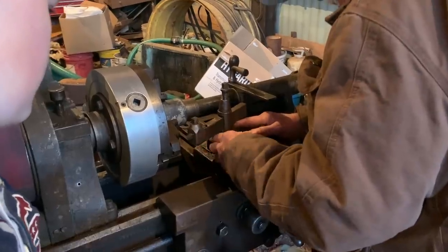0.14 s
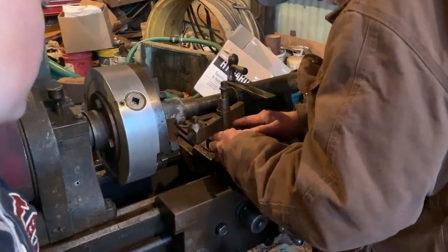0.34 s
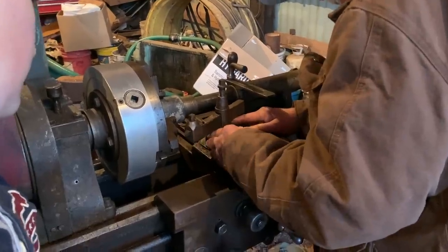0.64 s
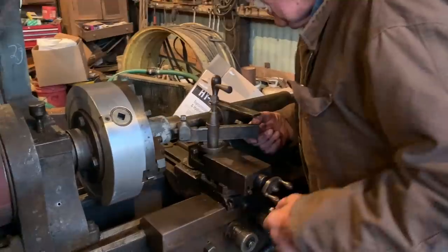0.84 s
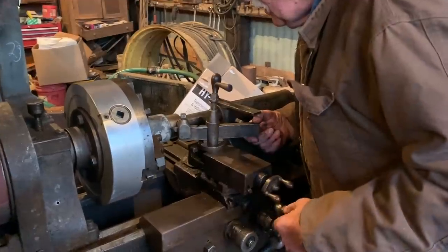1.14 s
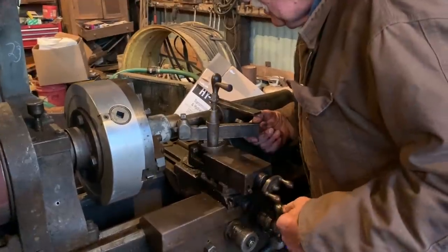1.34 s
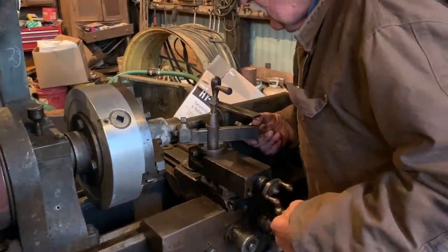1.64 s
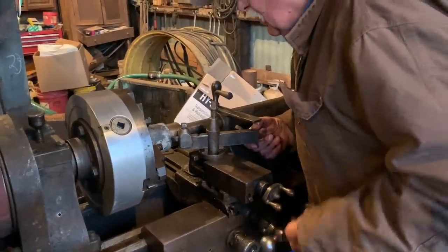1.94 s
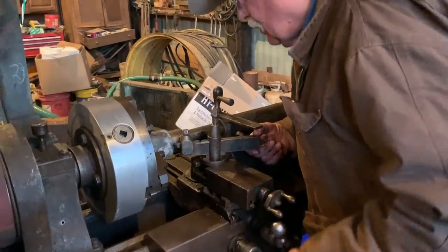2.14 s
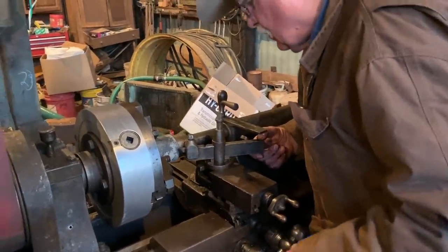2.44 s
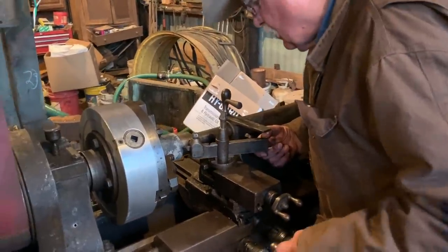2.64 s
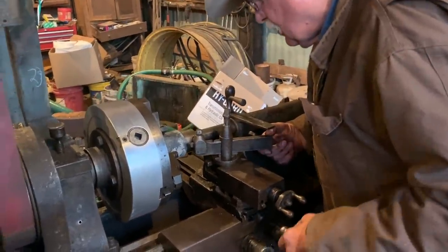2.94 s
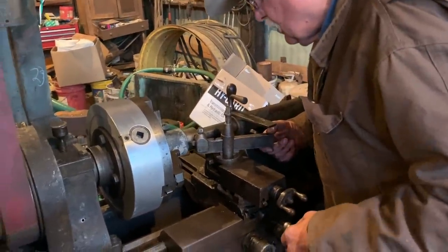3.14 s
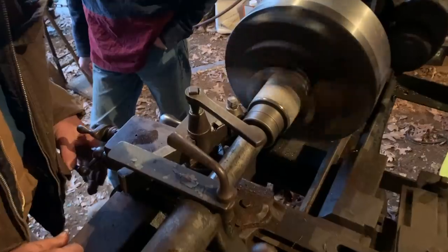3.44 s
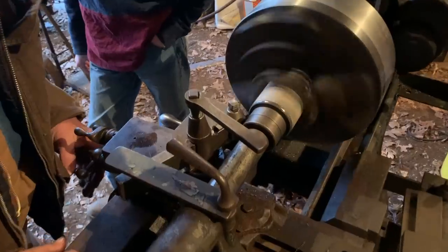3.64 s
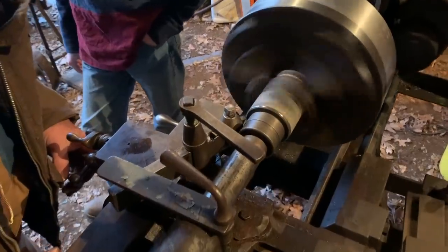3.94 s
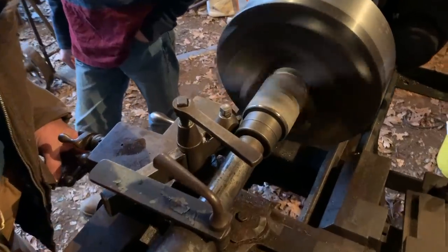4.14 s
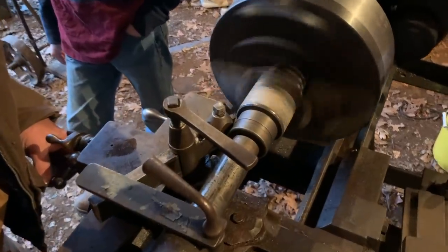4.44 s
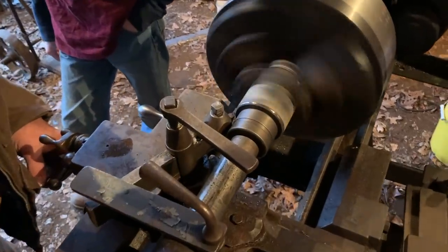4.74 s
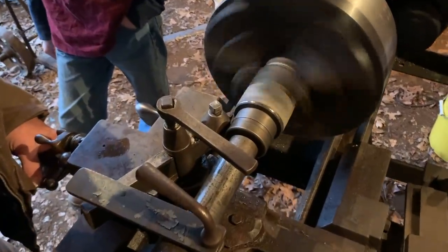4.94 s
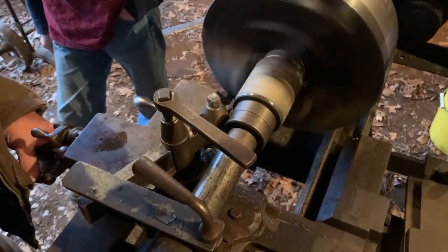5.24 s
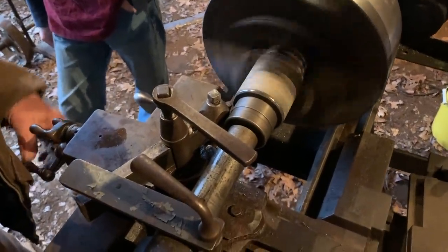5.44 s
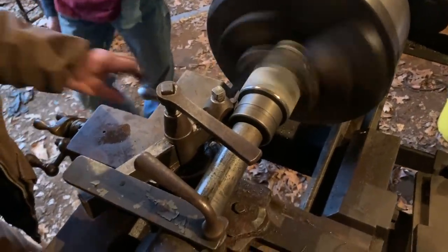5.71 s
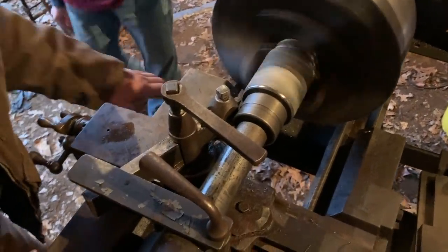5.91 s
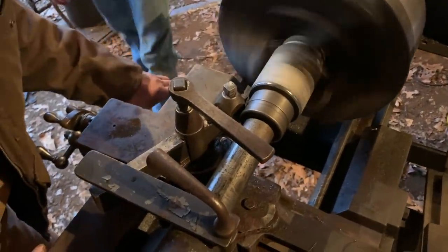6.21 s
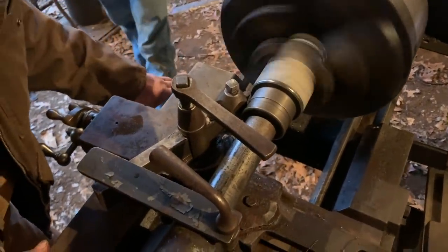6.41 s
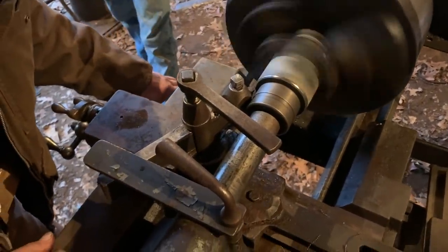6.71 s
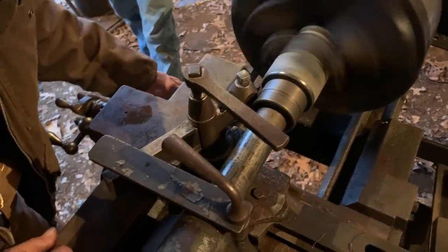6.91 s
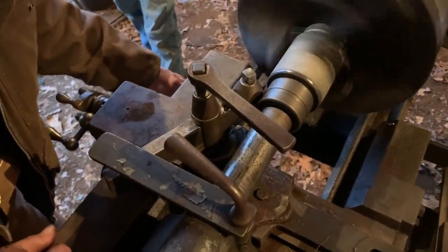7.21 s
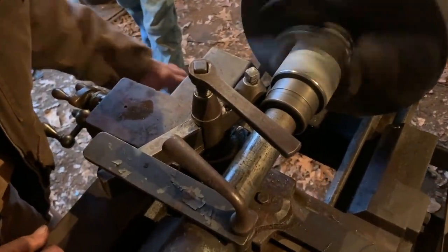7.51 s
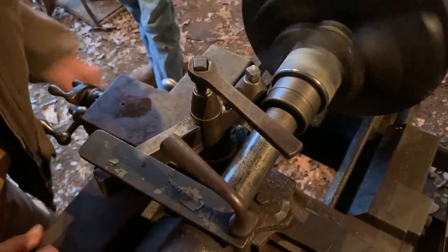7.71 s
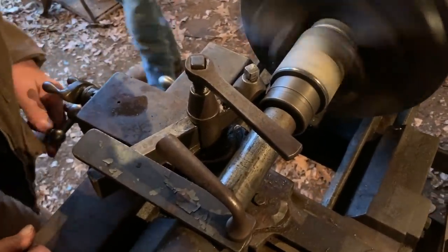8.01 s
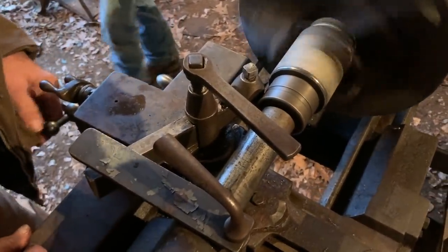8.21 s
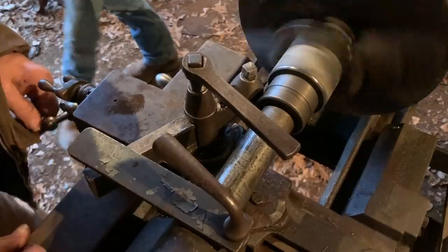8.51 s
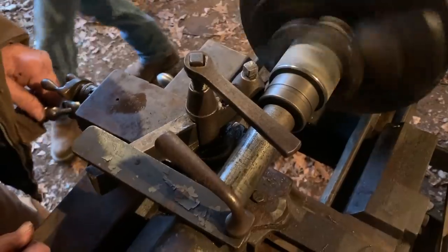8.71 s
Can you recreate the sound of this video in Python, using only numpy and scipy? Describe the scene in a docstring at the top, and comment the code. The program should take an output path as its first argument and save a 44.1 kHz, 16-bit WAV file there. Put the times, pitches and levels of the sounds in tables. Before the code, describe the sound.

Small clicks and dull knocks in a faint workshop hush jump to a running lathe, its tool biting five times a second and shrieking.

```python
"""Ticking in a faint room tone, then knocking handles, clicks of small metal parts and a rustling coat: a lathe at rest.
The sound then jumps to a second scene, the running cut. The bar runs out of true, so the tool bites in clusters
about five times a second, rasps through the modes of post and bed, and breaks into a high chatter squeal.
Shaped noise makes the room, rustle, clicks and tearing; gliding sines the knocks; wandering tones the hum and squeal."""
import sys
import numpy as np
from scipy import signal
from scipy.fft import rfft, irfft
from scipy.io import wavfile
from scipy.ndimage import uniform_filter1d

SR = 44100
rng = np.random.default_rng(int(sys.argv[2]) if len(sys.argv) > 2 else 0)


def store_wav(level_fs):
    """Save 16-bit WAV to argv[1]."""
    pcm = np.round(np.clip(np.atleast_2d(level_fs), -1, 1) * 32767)
    wavfile.write(sys.argv[1], SR, pcm.T.astype(np.int16))


N = 390726
T = np.arange(N) / SR
BINS = np.arange(N // 2 + 1) * SR / N + 1   # Hz, raised by 1 so the log exists at zero
CUT_S = 3.402   # the standing lathe gives way to the running one

# room tone colour: (frequency [Hz], relative level [dB per Hz])
ROOM_COLOUR = [(25, -28), (60, -1.5), (200, -11), (400, -5), (700, 3.5), (1100, -4), (2000, -13.5),
               (4500, -17), (6000, -25.5), (15500, -28.5)]
ROOM_DB = -58
# faint whines in the room: (frequency [Hz], level [dB], end [s])
WHINE_TONES = [(3610, -76, 3.4), (6550, -85, .8)]
# roughly regular tick further off: (time [s], level [dB])
TICK_HITS = [(0.002, -49), (0.832, -44), (1.692, -43), (2.551, -43)]
# tick colour: (frequency [Hz], relative level [dB per Hz])
TICK_COLOUR = [(1500, -10.5), (2130, -9), (2300, -5), (2520, 0), (2680, 5), (2790, -1), (2900, 1),
               (3200, -10), (3500, -16), (8000, -25), (12000, -24)]
TICK_T60_S = 0.29
# swells of a stiff coat: (time of top [s], level [dB], time scale [ms])
COAT_SWELLS = [(.875, -51, 25), (1.05, -63, 26), (1.181, -49.5, 16), (1.22, -50.5, 15), (1.29, -55.5, 14),
               (1.72, -62, 33), (1.97, -56.5, 44), (2.08, -54.5, 31), (2.22, -65, 49), (2.45, -59, 24),
               (2.57, -64, 24), (2.645, -53, 21), (2.785, -57.5, 22), (3.005, -62, 24), (3.17, -60.5, 32),
               (3.379, -59, 13)]
# coat colour: (frequency [Hz], relative level [dB per Hz])
COAT_COLOUR = [(1000, 3), (3000, 3), (6500, -4), (9000, -3.5), (13000, -1.5), (15800, -4)]
COAT_RISE, COAT_FALL = 0.7, 1.06   # shares of the time scale
# small metal parts: (time [s], level [dB], t60 [s])
CLICK_HITS = [(0.7926, -57, 0.027), (0.8666, -41, 0.027), (1.073, -57, 0.021), (1.1064, -55, 0.03),
              (1.1737, -56, 0.024), (1.186, -54, 0.03), (1.2126, -42, 0.023), (1.287, -49, 0.028),
              (1.4556, -65, 0.022), (1.9264, -49, 0.045), (1.986, -47, 0.038), (2.0867, -47, 0.035),
              (2.4644, -53, 0.03), (2.5167, -55, 0.021), (2.6244, -46, 0.023), (2.7433, -43, 0.018),
              (2.7904, -64, 0.024), (2.838, -50, 0.022), (3.0235, -46, 0.017), (3.3144, -53, 0.019)]
# click colour: (frequency [Hz], relative level [dB per Hz])
CLICK_COLOUR = [(300, 20), (1000, 16.5), (2500, 10), (5000, 8), (10000, 1), (15500, 6)]
# handle knocks through the bed: (time [s], level scale [dB], pitch scale [Hz])
HANDLE_KNOCKS = [(0.894, -38, 250), (1.217, -55, 260), (1.279, -53, 258), (1.712, -35, 400),
                 (1.964, -40, 242), (2.088, -32, 430), (2.440, -33, 363), (2.995, -33.5, 418),
                 (3.172, -52, 200), (3.256, -48, 252)]
# bed ringing after a knock: (frequency [Hz], relative level [dB per Hz])
BED_COLOUR = [(35, -18), (70, 6), (130, 2), (320, 0.5), (450, -6), (560, -3), (900, -15.5), (3000, -47)]

# running lathe: (time [s], drive rumble [dB], bar hum before easing [dB], rubbing before easing and modes [dB])
RUN_LEVELS = [(3.41, -38, -33, -30.5), (3.6, -41.5, -33.5, -33.5), (3.9, -38, -32.5, -33.5),
              (4.3, -39.5, -33, -32), (4.56, -37.5, -33.5, -31), (4.712, -36.5, -37.5, -34),
              (4.77, -51.5, -51, -46), (5.03, -50, -45.5, -45.5), (5.112, -41, -37, -37.5),
              (5.15, -53.5, -60, -47.5), (5.22, -50.5, -46, -44.5), (5.56, -56, -53, -50.5),
              (6.0, -61, -58.5, -55.5), (6.6, -58, -51, -48), (7.0, -58.5, -51, -47),
              (7.34, -57, -50, -46.5), (7.77, -56, -46.5, -42), (8.301, -56, -49, -42),
              (8.86, -56, -48.5, -45)]
# tool travel: (time [s], position [0 first - 1 last])
TOOL_TRAVEL = [(3.4, 0.016), (3.9, 0.055), (4.3, 0.1), (5.8, 0.18), (6.6, 0.77), (7.4, 0.92), (8.86, 0.95)]
# drive rumble colour: (frequency [Hz], relative level [dB per Hz])
RUMBLE_COLOUR = [(20, -45), (60, -13.5), (85, -2), (125, -0.5), (230, -5.5), (400, -4), (800, -5.5),
                 (2000, -31)]
# sliding bending modes of the bar, at the first and last position:
# (first frequency [Hz], last frequency [Hz], wander rate [Hz], first relative level [dB], last relative level [dB])
BAR_MODES = [(588.4, 503, 37, -5.5, 1.5), (1048, 985, 58, -2.5, -3), (1242, 1120, 177, -2.5, -7)]
TURN_S, FIRST_TURN_S = .2007, 3.395   # one spindle turn, and where a turn starts
# where the bar eases off: (middle into the turn [ms], half width [ms]) at first and last position
EASE_FIRST, EASE_LAST = (156.4, 32.3), (106.4, 17.5)
EASE_HUM_DB, EASE_RUBBING_DB = -5.5, -3.5
# post ringing as the tool digs in again: (time of top [s], level [dB])
DIG_HITS = [(3.411, -20), (3.607, -14.5), (3.805, -16), (4.0, -22), (4.2, -25), (4.398, -26.5)]
DIG_HZ, DIG_RISE_MS, DIG_FALL_MS = 1780, 8.5, 6.3
# regular bites, rubbing-relative; a row that ends before it starts stays silent:
# (time into turn [ms], rise [ms], fall [ms], start [s], end [s], start level [dB], half-way level [dB], end level [dB])
HIGH_SPOTS = [(14, 10.4, 6.7, 3.4, 4.67, 13, 15.4, 4.6), (31.3, 5, 4, 3.4, 4.7, 15, 9.6, 8.1),
              (47.5, 5.4, 22, 2, 4.7, 6, 9.2, 7.2), (97, 12, 5.7, 3.72, 4.2, 18, 14.9, 15),
              (12, 14, 14, 4.9, 6.3, 3, 3.5, 1.67), (42.8, 6.8, 6.4, 4.9, 5.9, 13, 4.8, 6.2),
              (70.6, 11.5, 8.2, 4.9, 5.95, 2, 4.1, 2.22), (98, 11.9, 10.6, 6.6, 5.95, 10, 6.4, 1.23),
              (151.7, 6.96, 7.7, 6.3, 8.86, -1.5, 19.9, 12.4), (183.6, 20.8, 9.2, 6.5, 7.7, -1, 13.6, 14),
              (56, 8.9, 9.8, 6.6, 8.86, 6, 14, 15.3), (18.1, 15.3, 6.4, 7.5, 8.86, 11, 15.3, 19)]
SPOT_SCATTER_DB, SPOT_SCATTER_MS = 1, 0.78
# the hardest bites, most of them on the same spots, adding to the regular ones:
# (time of top [s], level before modes [dB], rise and fall scale [ms])
HARDEST_BITES = [(3.411, -20, 8), (3.494, -18, 9), (3.609, -9.5, 4.5), (3.694, -19, 4.5), (3.809, -12, 5),
                 (3.845, -18.5, 6), (3.893, -28, 4.1), (4.295, -13.5, 2.5), (4.309, -21.5, 6.8),
                 (4.641, -30, 4.7), (5.043, -35, 5.7), (5.244, -46, 6), (6.446, -38.5, 9.6),
                 (7.061, -36.5, 9.5), (7.193, -39, 12), (7.393, -27.5, 17.6), (7.601, -26.5, 4.84),
                 (8.074, -25.5, 7.4), (8.228, -23, 11), (8.42, -23, 7), (8.44, -41, 3.76),
                 (8.61, -24.5, 6.4)]
# broad rasp colour: (frequency [Hz], relative level [dB per Hz])
RASP_COLOUR = [(300, -14.5), (800, -5.5), (1400, -6.5), (2400, -2), (4200, -2.5), (5600, -1.5), (8500, 7),
               (9500, -3.5), (11500, 5.5), (13000, -2), (15800, -5.5)]
# modes of tool, post and bed, at the first and last position:
# (frequency [Hz], width [Hz], first relative level [dB], last relative level [dB])
POST_MODES = [(1300, 1180, -5, -6.5), (1588, 51, 4, 12.5), (1761, 68.5, 22.5, 6.5), (2066, 54, -20, 17.5),
              (2517, 27, -25.5, 2.5), (3110, 140, -9, -1.5), (3940, 140, -11, 2), (4345, 94, -1.5, 6.5),
              (3574, 66, 6.5, 9), (5715, 240, 9.5, 12), (6240, 220, 3, -6), (6810, 53, 2, -6),
              (6940, 74, -12.5, 6.5), (7730, 170, 0.5, 5), (8150, 98, 8.5, -3.5), (10870, 540, -16, 1),
              (13800, 310, -3, 6.5)]
# the tip sings over one arc of each turn: (time [s], level [dB], locked pitch [Hz], arc length [ms])
TIP_SONG = [(3.8, -46.5, 11050, 240), (4.3, -40.5, 11150, 187), (4.45, -29, 10980, 210),
            (4.7, -28.5, 10880, 187), (4.78, -24.5, 10460, 139), (4.84, -27, 10480, 140),
            (4.91, -38, 10550, 140), (5.0, -29, 10550, 140), (5.12, -25, 10470, 146),
            (5.5, -24.5, 10320, 126), (5.8, -24.5, 10180, 117), (6.3, -26.5, 10200, 127),
            (6.7, -27.5, 10130, 130), (7.1, -34, 10270, 133.5), (7.449, -35, 10200, 129),
            (7.7, -34.5, 10130, 65), (8.099, -38, 10310, 45), (8.86, -39.5, 10250, 34)]
SONG_START_MS, SONG_EDGE_MS, SONG_BEAT_DB = 106, 3.0, 5.0
SONG_SAG_HZ, SONG_SAG_MS = 203, 21   # each arc starts this much sharp and settles
SONG_DIP_MS, SONG_DIP_WIDTH_MS, SONG_DIP_DB = 75, 14, -9   # falter inside the arc, deepening with position
# louder chatter bursts of the tip: (time of top [s], level [dB], time scale [ms])
CHATTER_BURSTS = [(3.948, -19, 4.5), (3.961, -18, 2.6), (4.349, -23.5, 4.8), (4.361, -26, 4.84),
                  (4.453, -31.5, 3), (4.492, -25, 2.6), (4.534, -29, 2.7), (4.554, -24, 7.0),
                  (4.571, -26, 3.3), (4.596, -20, 6.1), (4.737, -5.5, 7.8), (4.761, -14.5, 10.5),
                  (4.784, -21, 5.5), (4.803, -17, 6.9), (4.939, -19.5, 4), (4.997, -13, 3.0),
                  (5.036, -23, 4.1), (5.122, -9.5, 8.0), (5.164, -17, 5.8), (5.199, -15, 3),
                  (5.214, -12, 2.9), (5.312, -14.5, 5.9), (5.34, -17.5, 4.8), (5.362, -9.5, 4.9),
                  (5.426, -14.5, 4.8), (5.511, -19.5, 6.2), (5.533, -18, 4.5), (5.569, -17, 3.1),
                  (5.601, -18.5, 3.5), (5.62, -10.5, 6.8), (5.71, -18.5, 5.9), (5.735, -18.5, 6.8),
                  (5.754, -20.5, 3.8), (5.773, -24, 8.2), (5.808, -21, 7), (5.824, -13, 9.6),
                  (5.926, -22, 6.5), (5.958, -15.5, 10.2), (6.003, -23, 2.9), (6.03, -15.5, 5.2),
                  (6.137, -21.5, 4.0), (6.163, -15.5, 14.4), (6.228, -17.5, 5.3), (6.31, -25, 3.5),
                  (6.324, -22, 5.5), (6.364, -15, 4.8), (6.402, -17.5, 6.2), (6.427, -19.5, 3.8),
                  (6.52, -17.5, 6.2), (6.535, -19, 5.4), (6.548, -23, 4.5), (6.569, -21.5, 7.3),
                  (6.602, -24, 5.3), (6.62, -23, 4.1), (6.63, -17, 4.5), (6.721, -17, 6.3),
                  (6.735, -23.5, 2.2), (6.756, -22, 3.8), (6.803, -23.5, 2.5), (6.832, -21.5, 4.5),
                  (6.923, -21.5, 6.8), (6.953, -25, 7.1), (7.01, -23.5, 2.1), (7.03, -30, 5.2),
                  (7.135, -26, 5.5), (7.203, -27.5, 2.9), (7.221, -32, 5), (7.323, -26.5, 4.1),
                  (7.337, -24.5, 4.5), (7.405, -23, 3.5), (7.42, -27, 3.4), (7.525, -12.5, 4.1),
                  (7.612, -24, 2.8), (7.726, -13.5, 5.3), (7.74, -22.5, 4.6), (7.924, -13.5, 3.2),
                  (7.94, -21, 7), (8.125, -20.5, 3.0), (8.328, -20, 3.0), (8.343, -25.5, 3.5),
                  (8.525, -17, 2.9), (8.543, -27.5, 3.2), (8.727, -21.5, 2.8), (8.743, -28, 3.2)]
BURST_RISE, BURST_FALL = 0.92, 0.89   # shares of the time scale
# weak chatter slips to the free pitch, fully so SLIP_DB below the locking level
FREE_HZ, LOCK_DB, SLIP_DB = 10820, -22, 25
# noise around the squeal: (frequency [Hz], relative level [dB per Hz])
CHATTER_COLOUR = [(8500, -32), (9700, -2), (10150, 7), (10600, 11.5), (11200, -0.5), (11800, -46),
                  (13000, -118)]
SQUEAL_TAIL_DB, SQUEAL_TAIL_T60_S = -18.5, 0.35   # the room holds the squeal a moment

# left-right likeness: (frequency [Hz], near the tool [0-1], diffuse [0-1])
STEREO_LIKENESS = [(60, 1, 0.4), (300, 1, 0.95), (895, 0.58, 0.087), (2420, 0.63, 0.05), (4600, 1, 0.22),
                   (8400, 0.92, 0.89), (15000, 1, 0.21)]
# microphone ports: (frequency [Hz], right side's phase lead [rad])
PORT_PHASE = [(0, 0), (150, -.25), (300, -.6), (900, -1), (1400, -.2), (1900, .3), (2600, 1.2), (4000, 1.5),
              (5000, 3.14), (22050, 29.9)]
LEFT_BASS_DB, LEFT_BASS_HZ = -1.1, 686   # left bass against right, below about this frequency
CUTOFF_HZ = 16100
NEAR, DIFFUSE = 1, 2   # columns of STEREO_LIKENESS


def from_db(db):
    """dB to gain."""
    return 10 ** (np.asarray(db) / 20)


def rms_one(x):
    """Scale to rms 1."""
    return x / np.sqrt(np.mean(x ** 2) + 1e-20)


def at_hz(table, axis=1):
    """A column of a table at every FFT bin, straight on log frequency."""
    rows = np.array(table)
    return np.interp(np.log(BINS), np.log(rows[:, 0]), rows[:, axis])


def drift(rate):
    """Random wander: noise through a two-pole low-pass at rate Hz, scaled to rms 1."""
    r = np.exp(-2 * np.pi * rate / SR)
    white = rng.standard_normal(N + SR)
    return rms_one(signal.lfilter([1], [1, -2 * r, r * r], white)[SR:])   # settled part only


def noise(spectrum, axis):
    """Coloured stereo noise of rms 1; mid and side are weighed by the left-right likeness."""
    mid, side = rfft(rng.standard_normal((2, N))) * from_db(at_hz(spectrum))
    alike = np.clip(at_hz(STEREO_LIKENESS, axis=axis), 0, 1)
    sides = np.sqrt(1 + alike) * mid + np.sqrt(1 - alike) * side * [[1], [-1]]
    return rms_one(irfft(sides, N))


def resonance(x, hz, width):
    """Two-pole peak of gain 1."""
    r = np.exp(-np.pi * width / SR)
    poles = [1, -2 * r * np.cos(2 * np.pi * hz / SR), r * r]
    return signal.lfilter([(1 - r * r) / 2, 0, (r * r - 1) / 2], poles, x)


def bursts(rows, shape):
    """Power of summed swells; each is at half amplitude one rise before and one fall after its top."""
    power = np.zeros(N)
    for s, db, rise_ms, fall_ms in rows:
        top = round(s * SR)
        near = slice(max(top - 4000, 0), top + 6000)
        ms = (T[near] - s) * 1000
        steps = np.abs(ms / np.where(ms < 0, rise_ms, fall_ms))
        power[near] += from_db(2 * db) * .25 ** (steps ** shape)
    return power


def decays(rows, attack_s):
    """Envelope of hits (time [s], level [dB], t60 [s]) that die away exponentially."""
    out = np.zeros(N)
    for s, db, t60 in rows:
        start = round(s * SR)
        since = T[:SR // 2][:N - start]
        out[start:][:len(since)] += from_db(db - 60 * since / t60) * (1 - np.exp(-since / attack_s))
    return out


def room():
    """Diffuse coloured noise whose level wanders gently."""
    return from_db(ROOM_DB + .7 * drift(5)) * noise(ROOM_COLOUR, axis=DIFFUSE)


def whines():
    """Noise through two narrow resonances in a row becomes a faint, slightly wavering tone."""
    out = np.zeros(N)
    for hz, db, last in WHINE_TONES:
        narrow = rms_one(resonance(rng.standard_normal(N), hz, 25.0))
        out += from_db(db) * resonance(narrow, hz, 25.0) * (T < last)
    return out


def ticks():
    """Soft-edged hits of diffuse noise, each decaying into the room."""
    hits = [(s, db, TICK_T60_S) for s, db in TICK_HITS]
    return decays(hits, attack_s=0.0051) * noise(TICK_COLOUR, axis=DIFFUSE)


def rustle():
    """Stiff cloth makes swells of noise with a fast crackling flutter."""
    rows = [(s, db, COAT_RISE * ms, COAT_FALL * ms) for s, db, ms in COAT_SWELLS]
    crackle = from_db(2.7 * drift(200.0))
    return np.sqrt(bursts(rows, shape=1.1)) * crackle * noise(COAT_COLOUR, axis=DIFFUSE)


def clicks():
    """Small metal parts give sharp, short-lived hits of noise."""
    return decays(CLICK_HITS, attack_s=.0002) * noise(CLICK_COLOUR, axis=NEAR)


def knocks():
    """A bending wave brings its high part first, so each knock drops in pitch; the bed rings on."""
    out, since = np.zeros(N), T[:SR // 16]
    for s, db, hz in HANDLE_KNOCKS:
        glide = 0.272 + 0.827 / (1 + (since / 0.00762) ** 3)
        phase = 2 * np.pi * np.cumsum(hz * glide) / SR
        swell = since / 0.0068 * np.exp(1 - since / 0.0063)
        out[round(s * SR):][:len(since)] += from_db(db) * swell * np.sin(phase)
    ringing = decays([(s, db - 9.5, .4) for s, db, _ in HANDLE_KNOCKS], attack_s=0.00067)
    return out + ringing * noise(BED_COLOUR, axis=NEAR)


def rumble(rumble_db):
    """The drive is low coloured noise with an unsteady level."""
    return from_db(rumble_db + 1.15 * drift(19.5)) * noise(RUMBLE_COLOUR, axis=NEAR)


def into_turn_ms(start_ms):
    """Time since the bar last passed an angle."""
    return ((T - FIRST_TURN_S) * 1000 - start_ms) % (TURN_S * 1000)


def easing(position):
    """The bar runs out of true: 0 in full contact, 1 where it has eased off the tool, once a turn."""
    middle_ms, width_ms = [a + (b - a) * position for a, b in zip(EASE_FIRST, EASE_LAST)]
    half_turn_ms = TURN_S * 500
    from_middle_ms = into_turn_ms(middle_ms - half_turn_ms) - half_turn_ms
    return .5 ** ((from_middle_ms / width_ms) ** 4)


def hum(position):
    """Each bar mode is a sliding tone whose strength and phase wander; part of it differs between the sides."""
    out = np.zeros((2, N))
    for first_hz, last_hz, width, first_db, last_db in BAR_MODES:
        phase = 2 * np.pi * np.cumsum(first_hz + (last_hz - first_hz) * position) / SR
        mid, side = [drift(width) * np.cos(phase) + drift(width) * np.sin(phase) for _ in range(2)]
        mode_db = first_db + (last_db - first_db) * position
        out += from_db(mode_db) * (mid + 0.47 * side * [[1], [-1]])
    return rms_one(out)


def digs():
    """The main mode of the post rings briefly, with a wandering pitch, as the tool digs in again."""
    phase = 2 * np.pi * np.cumsum(DIG_HZ + 24.9 * drift(30.0)) / SR
    rows = [(s, db, DIG_RISE_MS, DIG_FALL_MS) for s, db in DIG_HITS]
    return np.sqrt(2 * bursts(rows, shape=1.43)) * np.sin(phase)


def bites(rubbing_db):
    """Each high spot bites once a turn, a little differently every time; some bites are struck harder."""
    rows, turns = [], FIRST_TURN_S + TURN_S * np.arange(28)
    for ms, rise_ms, fall_ms, first, last, *over_db in HIGH_SPOTS:
        shift, harder = rng.standard_normal((2, len(turns)))
        s = turns + (ms + SPOT_SCATTER_MS * shift) / 1000
        over = np.interp(s, [first, (first + last) / 2, last], over_db)
        db = np.interp(s, T, rubbing_db) + over + SPOT_SCATTER_DB * harder
        rows += [(s[k], db[k], rise_ms, fall_ms) for k in np.flatnonzero((s > first) & (s < last))]
    return rows + [(s, db, ms, ms) for s, db, ms in HARDEST_BITES]


def rasp(rubbing_db, position):
    """Grainy tearing of the chip excites the modes; each flutters, and their balance shifts as the tool moves."""
    grain = from_db(1.83 * drift(174.0) + 1.7 * drift(27.4))
    dull = np.exp(-2 * np.pi * 3500.0 / SR)   # light rubbing is duller than a bite
    dulled = rms_one(signal.lfilter([1], [1, -dull], noise(RASP_COLOUR, axis=NEAR)))
    rubbing = from_db(rubbing_db + EASE_RUBBING_DB * easing(position)) * dulled
    biting = np.sqrt(bursts(bites(rubbing_db), shape=1.18)) * noise(RASP_COLOUR, axis=NEAR)
    tearing = (biting + rubbing) * grain * (T > CUT_S)
    out = from_db(-5.0) * tearing   # heard directly, beside the modes
    for hz, width, first_db, last_db in POST_MODES:
        mode_db = first_db + (last_db - first_db) * position + 2 * drift(12)
        out = out + from_db(mode_db) * resonance(tearing, hz, width)
    return from_db(-4.0) * out


def chatter_power(position):
    """Song over its arc of the turn, beating at random, plus the louder bursts."""
    s, level_db, _, arc_length_ms = np.transpose(TIP_SONG)
    db, arc_ms = np.interp(T, s, level_db, left=-99), np.interp(T, s, arc_length_ms)
    ms = into_turn_ms(SONG_START_MS)
    arc = np.clip(np.minimum(ms, arc_ms - ms) / SONG_EDGE_MS, 0, 1)
    dip_db = SONG_DIP_DB * position * .5 ** (((ms - SONG_DIP_MS) / SONG_DIP_WIDTH_MS) ** 2)
    song = arc * from_db(db + dip_db + SONG_BEAT_DB * drift(40.3))
    rows = [(s, db, BURST_RISE * ms, BURST_FALL * ms) for s, db, ms in CHATTER_BURSTS]
    return song ** 2 + bursts(rows, shape=1.7)


def squeal(position):
    """The tool tip sings at one wavering pitch, with chatter noise around it; weak chatter slips and blurs."""
    s, _, pitch_hz, _ = np.transpose(TIP_SONG)
    power = chatter_power(position)
    power_db = 10 * np.log10(uniform_filter1d(power, size=200) + 1e-9)
    slip = np.clip((LOCK_DB - power_db) / SLIP_DB, 0, 1)
    sag_hz = SONG_SAG_HZ * np.exp(-into_turn_ms(SONG_START_MS) / SONG_SAG_MS)
    locked_hz = np.interp(T, s, pitch_hz) + sag_hz
    hz = locked_hz + slip * (FREE_HZ - locked_hz) + 33.1 * drift(57.3)
    phase = 2 * np.pi * np.cumsum(hz) / SR
    clear = np.interp(hz, [10300, 10750, 11050], [.98, .96, .6]) * (1 - slip)   # purer when low and locked
    slipping = drift(270.0) * np.cos(phase) + drift(330.0) * np.sin(phase)
    tip = clear * np.sqrt(2) * np.sin(phase) + np.sqrt(1 - clear ** 2) * slipping
    keep = from_db(-120 / (SQUEAL_TAIL_T60_S * SR))   # power falls 60 dB in one t60
    tail = from_db(2 * SQUEAL_TAIL_DB) * signal.lfilter([1 - keep], [1, -keep], power + 1e-18)
    chatter = np.sqrt(from_db(-23.0) * power + tail) * noise(CHATTER_COLOUR, axis=NEAR)
    return np.sqrt(power + tail) * from_db(drift(120)) * tip + chatter


def scene():
    """Standing lathe, then the running cut."""
    s, *columns = np.transpose(RUN_LEVELS)
    rumble_db, hum_db, rubbing_db = [np.interp(T, s, c) for c in columns]
    position = np.clip(np.interp(T, *np.transpose(TOOL_TRAVEL)), 0, 1)
    standing = room() + whines() + ticks() + rustle() + clicks() + knocks()
    bar_hum = from_db(hum_db + EASE_HUM_DB * easing(position)) * hum(position)
    running = rumble(rumble_db) + bar_hum + digs() + squeal(position)
    return standing * (T < CUT_S) + running * (T > CUT_S) + rasp(rubbing_db, position)


def record(dry):
    """The two ports shift phase and bass between the sides; peaks are rounded, the top is cut."""
    sides = np.array([[-1], [1]])   # left, right: each takes half the difference
    turn = np.exp(.5j * sides * np.interp(BINS, *np.transpose(PORT_PHASE)))
    bass = from_db(-.5 * sides * LEFT_BASS_DB / (1 + (BINS / LEFT_BASS_HZ) ** 4))
    ports = irfft(rfft(dry) * turn * bass, N)
    rounded = .92 * np.tanh(ports / .92)
    return signal.sosfilt(signal.cheby2(20, 80, CUTOFF_HZ, fs=SR, output="sos"), rounded)


dry = scene()
out = record(dry)
store_wav(out)
```